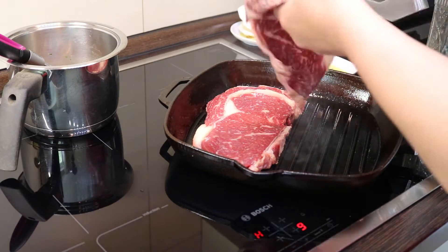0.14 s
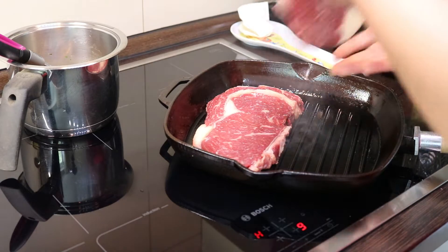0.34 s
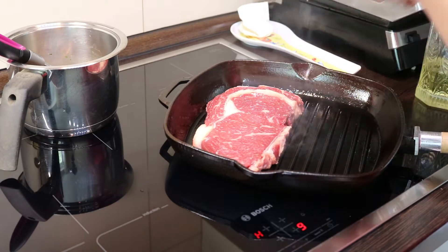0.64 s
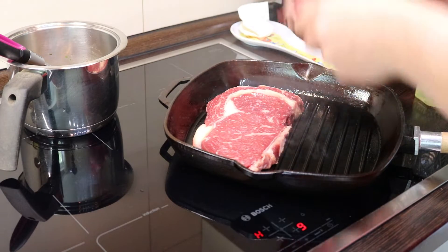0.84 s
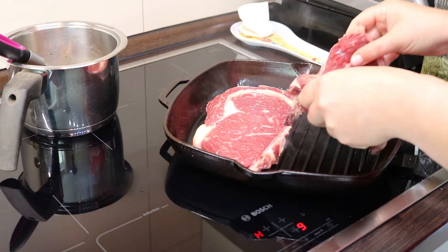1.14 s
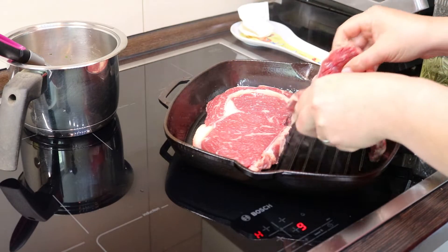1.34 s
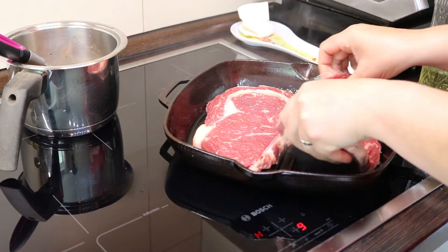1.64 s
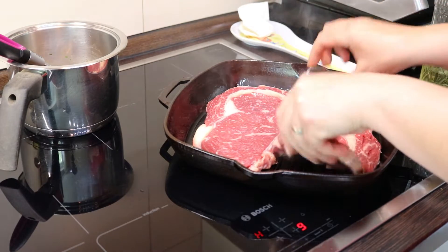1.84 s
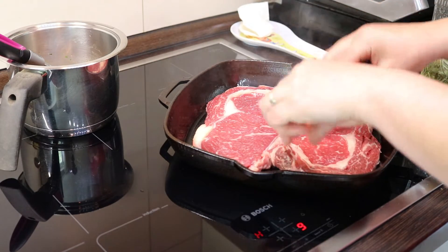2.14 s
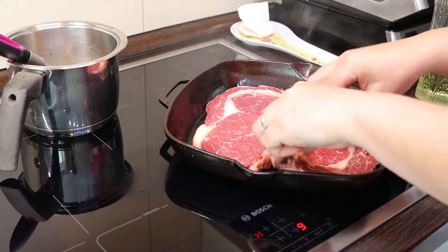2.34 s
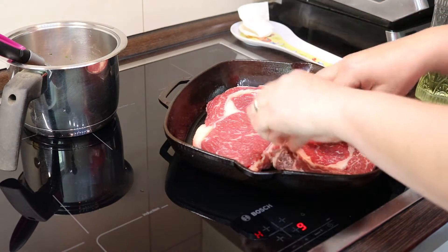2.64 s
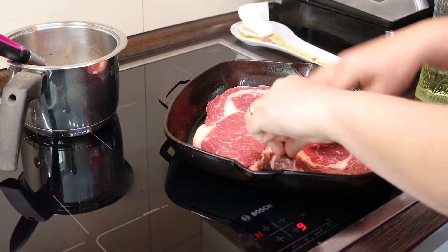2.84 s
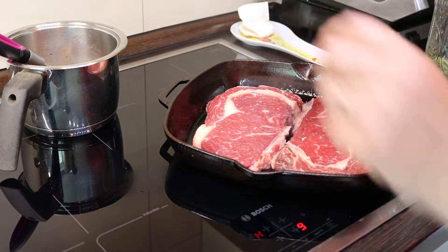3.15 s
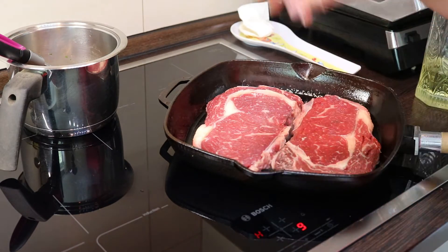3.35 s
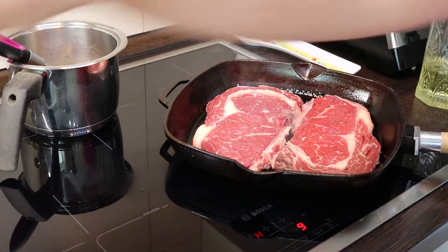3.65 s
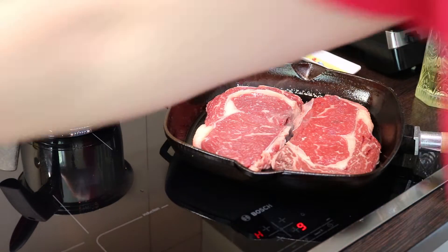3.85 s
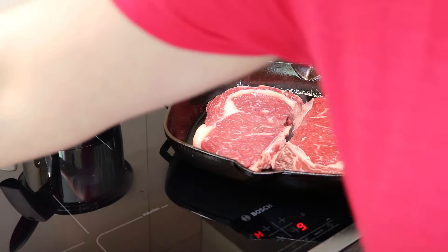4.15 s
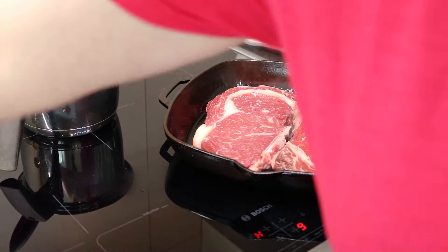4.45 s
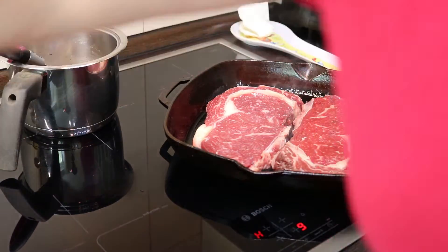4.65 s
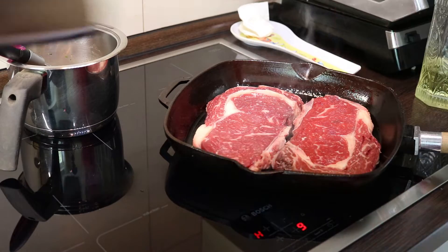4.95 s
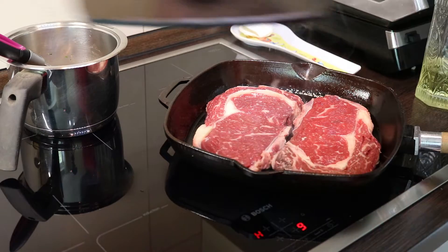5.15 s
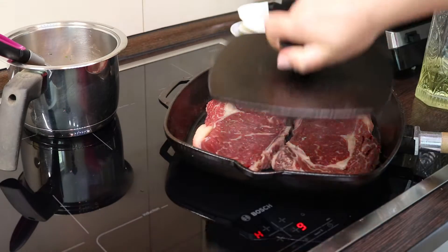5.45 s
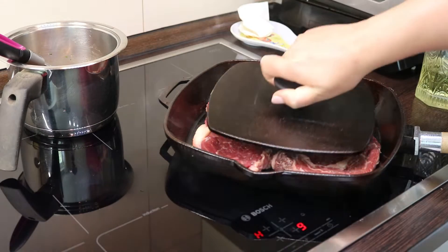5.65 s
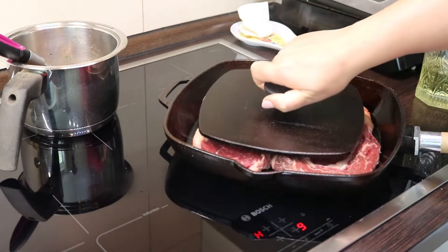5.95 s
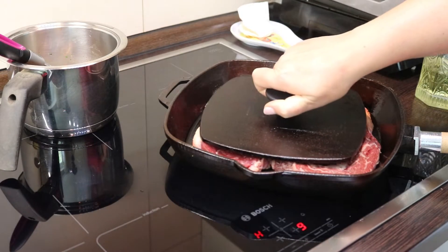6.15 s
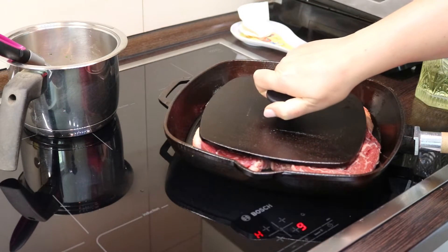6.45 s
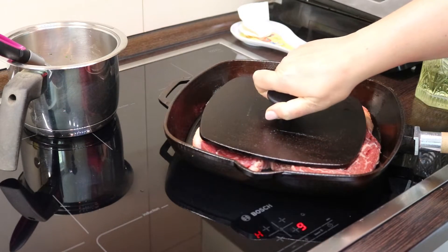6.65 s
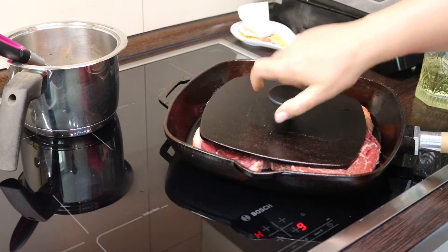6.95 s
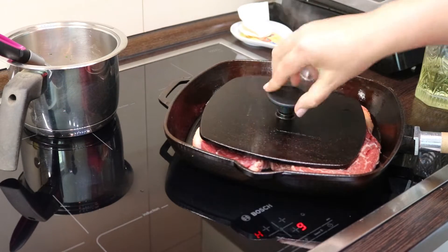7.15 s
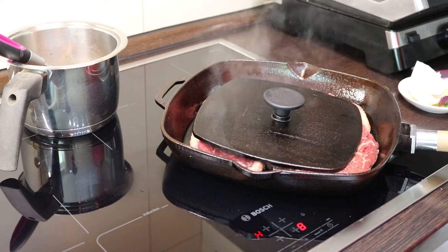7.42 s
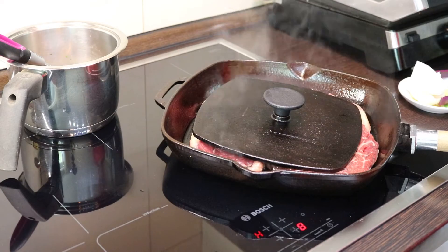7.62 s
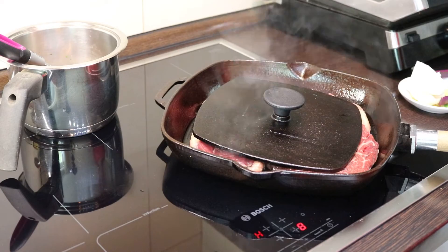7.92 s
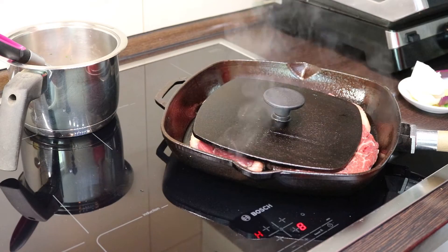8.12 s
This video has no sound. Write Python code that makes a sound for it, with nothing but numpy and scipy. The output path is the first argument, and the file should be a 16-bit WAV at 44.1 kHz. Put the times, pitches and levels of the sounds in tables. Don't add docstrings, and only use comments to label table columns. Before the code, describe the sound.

Two steaks sizzle in a heavy iron pan in a small, hard-surfaced kitchen, heard from very near. Crackling spits scatter left and right over steady fizz and a barely audible low hum. The strongest pops come early and near the middle; pressing the meat brings bubbling, knocking bursts. The frying suddenly stops, leaving brief faint air, silence, and a trace of hiss.

```python
import sys
import numpy as np
from scipy import signal
from scipy.fft import rfft, irfft, next_fast_len
from scipy.io import wavfile
from scipy.ndimage import uniform_filter1d, map_coordinates

SR = 44100
rng = np.random.default_rng(int(sys.argv[2]) if len(sys.argv) > 2 else 0)


def voltage_ratio(level):
    return 10 ** (np.asarray(level, float) / 20)


def transcribe(u):
    v = np.clip(np.atleast_2d(u).T, -1, 1)
    q = np.round(v * 32767).astype(np.int16)
    wavfile.write(sys.argv[1], SR, q)


N = 365148
CUT_S = 7.3353
PAN_CUT_HZ = 760


def unit(x):
    return x / np.sqrt(np.mean(x ** 2) + 1e-20)


def along(points, hz):
    f, v = np.transpose(points)
    return np.interp(np.log(hz + 1), np.log(f + 1), v)


def curves(rows):
    s, *cols = np.transpose(rows)
    return [np.interp(np.arange(N) / SR, s, c) for c in cols]


def wobble(rate_hz):
    coarse = np.arange(0, N + 32, 32)
    knots = rng.standard_normal(int(N * rate_hz / SR) + 4)
    return np.interp(np.arange(N), coarse, map_coordinates(knots, [coarse * rate_hz / SR]))


def filtered(x, response):
    m = next_fast_len(N + 8192)
    return irfft(rfft(x, m) * response(np.fft.rfftfreq(m, 1 / SR)), m)[..., :N]


def spread(pair, spectrum, alike, shape=lambda hz: 1):
    def response(hz):
        turn = np.arccos(np.clip(along(alike, hz), -1, 1)) / 2
        return voltage_ratio(along(spectrum, hz)) * shape(hz) * [np.cos(turn), np.sin(turn)]
    mid, side = filtered(pair, response)
    return np.array([mid + side, mid - side])


def patchy(patchy_db):
    z = signal.stft(rng.standard_normal((2, N)), nperseg=256)[2]
    field = uniform_filter1d(rng.standard_normal(z.shape[1:]), size=8, axis=0)
    field = uniform_filter1d(field, size=9, axis=1)
    return signal.istft(z * voltage_ratio(patchy_db * unit(field)), nperseg=256)[1][:, :N]


def bursts(rate_hz, size_db, life_s):
    draw = rng.random((2, N))
    size = (draw[0] < rate_hz / SR) * voltage_ratio(-size_db * np.log(draw[1] + 0.0098))
    return signal.lfilter([1], [1, -np.exp(-1 / (SR * life_s))], size)


def snap(pitch_hz, cycles):
    turns = pitch_hz * np.arange(200) / SR
    return -np.sin(2 * np.pi * turns) * np.exp(-(turns - .25) / cycles) * (1 - np.exp(-turns * 8))


# start_s, dip_db, recovery_s
DUCKS = [(.131, -3, 0.097), (.368, -3.5, 0.052), (.872, 0, 0.014), (3.57, -3.5, 0.024)]


def ducking():
    t = np.arange(N) / SR
    return sum(dip_db * (t > s) * np.exp(-(np.maximum(t - s, 0) / recovery_s) ** 2)
               for s, dip_db, recovery_s in DUCKS)


# pitch_hz, density_db (per Hz)
NEXT_HISS = [(88, -48), (150, -17), (328, 1.5), (1980, -19.5), (5930, -9.5), (8000, -25), (10400, -52),
             (17600, -120)]


def next_scene():
    start_s, rise_db_per_s, end_db = 8.2, 700, -60.5
    t = np.arange(N) / SR
    hiss = unit(filtered(rng.standard_normal(N), lambda hz: voltage_ratio(along(NEXT_HISS, hz))))
    return (t > start_s) * voltage_ratio(end_db - rise_db_per_s * (t[-1] - t)) * hiss


# pitch_hz, density_db (per Hz)
AIR = [(8.8, -33), (15, -1), (50, -5), (72, -10.5), (112, -22), (142, -25), (159, -37), (195, -23),
       (286, -35), (770, -31.5), (2650, -39.5), (3400, -46), (7280, -53), (14700, -50), (16000, -60)]
# start_s, end_s
SCRAPS = [
    (7.4825, 7.6725),
    (7.6825, 7.693),
]


def scrap():
    t = np.arange(N) / SR
    on = sum((t >= start_s) & (t < end_s) for start_s, end_s in SCRAPS)
    alike = [(300, .05), (900, 0.75), (2500, 0.77), (5000, .03)]
    air = unit(spread(rng.standard_normal((2, N)), AIR, alike))
    return voltage_ratio(-46.5 + .6 * wobble(30)) * on * air


# start_s, level_db
HUM = [(0, -55), (2.2, -57.5), (3.4, -64), (4.0, -61.5), (4.4, -57.5), (5.3, -60), (6.6, -59), (6.7, -67),
       (7.3, -62.5)]
# pitch_hz, density_db (per Hz)
RUMBLE = [(13, -60.5), (22, -28.5), (43, -18), (91, -14.5), (150, -13.5), (232, -13), (400, -10),
          (520, -29), (880, -120)]


def stove():
    turn = 2 * np.pi * 100 * np.arange(N) / SR + 0.6 * wobble(11)
    hum = np.sin(turn) + voltage_ratio(-17.0) * np.sin(2 * turn) + voltage_ratio(-11.5) * np.sin(3 * turn)
    rumble = unit(spread(patchy(patchy_db=1.0), RUMBLE, [(40, .1), (150, 0.32)]))
    hum_db = curves(HUM)[0] + 1.5 * ducking() + 1.6 * wobble(8.6) + 1.0 * wobble(25)
    draught_db = 1.5 * wobble(6)
    return voltage_ratio(hum_db) * np.sqrt(2) * hum + voltage_ratio(-60 + draught_db) * rumble


# pitch_hz, t60_s
KITCHEN = [(200, 0.33), (2000, 0.12), (10000, 0.085)]


def kitchen(x):
    hz, t, z = signal.stft(rng.standard_normal((2, SR // 3)), SR, nperseg=256)
    decay = voltage_ratio(-60 * t / along(KITCHEN, hz)[:, None])
    tail = signal.istft(z * decay, SR, nperseg=256)[1]
    delayed = np.pad(x, ((0, 0), (500, 0)))
    return signal.fftconvolve(delayed, tail / np.linalg.norm(tail[0]), axes=1)[:, :N]


# start_s, peak_db, pitch_hz, t60_s
THUMPS = [(0.952, -37.5, 120, .15), (1.01, -29, 378, 0.15), (1.031, -41, 260, 0.21),
          (1.342, -23.5, 896, 0.12), (1.86, -29, 700, 0.069), (2.663, -29.5, 750, 0.044),
          (3.189, -31, 750, 0.072), (4.535, -28.5, 800, 0.1), (4.755, -32, 700, 0.093),
          (5.87, -24.5, 1000, 0.05), (6.158, -20.5, 1300, 0.069), (6.456, -29, 800, 0.14),
          (3.355, -37, 270, 0.22), (3.41, -31.5, 200, 0.099), (3.44, -41.5, 150, .12),
          (3.85, -36.5, 350, 0.074), (3.87, -40, 190, .15), (4.889, -24, 980, 0.074),
          (5.47, -41, 172, 0.15), (5.6, -38, 238, .2), (6.05, -24, 1020, 0.13), (6.549, -21, 960, 0.09)]
# start_s, peak_db
BLASTS = [
    (0.105, -18),
    (.1285, -11),
    (0.8666, -25),
    (3.5624, -6),
]


def thumps():
    out, t = np.zeros(N + SR), np.arange(SR // 4) / SR
    for start_s, peak_db, pitch_hz, t60_s in THUMPS:
        band = signal.butter(1, [pitch_hz * .45, pitch_hz * 1.9], "bandpass", fs=SR)
        noise = rng.standard_normal(len(t))
        shake = unit(signal.lfilter(*band, signal.lfilter(*band, noise)))
        onset = 1 - np.exp(-t * pitch_hz / 2.9)
        out[round(start_s * SR):][:len(t)] += voltage_ratio(peak_db - 3.5 - 60 * t / t60_s) * onset * shake
    for start_s, peak_db in BLASTS:
        out[round(start_s * SR):][:len(t)] += voltage_ratio(peak_db) * np.exp(-t / 0.000077)
    return out[:N]


# pitch_hz, density_db (per Hz)
SIZZLE = [(150, -57), (250, -24), (466, -15), (535, -13), (682, -13), (1130, -6.5), (1430, -7.5), (2290, 2),
          (6920, 5), (14100, -2.5), (15600, -7.5)]


def spatter(level_db):
    drops = bursts(rate_hz=90, size_db=2, life_s=0.0002) * rng.standard_normal((2, N))
    return voltage_ratio(level_db - 11) * unit(spread(drops, SIZZLE, [(1000, 0.56), (10000, .3)]))


# start_s, peak_db, pitch_hz
TICKS = [(0.0487, -12.5, 5600.0), (0.2135, -1, 5190), (0.2494, -8.5, 6100.0), (0.6508, -18.5, 6400.0),
         (0.6958, -14.5, 9100.0), (0.9158, -15, 6900.0), (1.099, -7, 6090), (1.2168, -12.5, 6600.0),
         (1.2642, -24, 6000.0), (1.414, -14.5, 4100.0), (1.5278, -2, 8280), (1.9153, -10, 4100.0),
         (1.9412, -12, 3900.0), (2.0448, -10.5, 7900.0), (2.188, -7.0, 10730), (2.196, -8.5, 10000.0),
         (2.2107, -15.5, 7100.0), (2.2496, -14.5, 6110), (2.368, -10, 4300.0), (2.5032, -6.5, 8420),
         (2.5878, -11.0, 12630), (2.6409, -6, 10400.0), (2.9817, -13, 8670), (3.026, -11.0, 7380),
         (3.1888, -5.5, 7700.0), (3.3659, -9, 7000.0), (3.64, -8, 5500.0), (3.858, -13.5, 6000.0),
         (3.8787, -14.5, 6700.0), (4.0326, -3.5, 6280), (4.1689, -13, 5900.0), (4.2819, -8, 9140),
         (4.3837, -14.0, 7220), (4.4746, -11, 7290), (4.5644, -10.0, 6710), (4.6311, -13.5, 4700.0),
         (4.6502, -13.5, 4800.0), (4.673, -6.5, 6900.0), (4.8727, -15.5, 3200.0), (4.9132, -7.5, 8300.0),
         (5.0091, -9.5, 8400.0), (5.0617, -19.5, 4310), (5.3507, -14.0, 7520), (5.416, -16, 7480),
         (5.436, -10, 8930), (5.455, -5, 9600.0), (5.4693, -13.0, 7600.0), (5.5118, -7.5, 5900.0),
         (5.52, -5.5, 7900.0), (5.5237, -2, 6430), (5.6512, -10, 8000.0), (5.788, -10.5, 9570),
         (5.834, -12.5, 7380), (5.9639, -11, 7960), (5.9716, -12.5, 9200.0), (5.991, -14, 4500.0),
         (6.7564, -11, 6900.0), (7.2542, -10, 5400.0), (7.2747, -13.5, 3400.0), (7.292, -19.5, 4800.0)]


def ticks():
    out = np.zeros((2, N))
    for start_s, peak_db, pitch_hz in TICKS:
        crack = snap(pitch_hz, cycles=.9)
        port_db = peak_db + rng.normal(0, 1.3, (2, 1))
        out[:, round(start_s * SR):][:, :len(crack)] += voltage_ratio(port_db) * crack
    return signal.lfilter(*signal.butter(2, PAN_CUT_HZ, "highpass", fs=SR), out)


# delay_ms, level_db
ECHOES = [(.7, -3.5), (1.7, -6.5), (2.9, -4), (4.6, -1), (6.2, -8.5), (8.9, -7), (12, -20)]


def reply():
    n = np.arange(SR // 40)
    delay_ms, level_db = np.transpose(ECHOES)[:, :, None]
    late = n - delay_ms * SR / 1000
    shape = np.sum(voltage_ratio(level_db - 16.5) * (late >= 0) * np.exp(-np.abs(late) / 50), axis=0)
    return (n == 0) + shape * rng.standard_normal((2, len(n)))


# start_s, peak_db, pitch_hz, body_db, treble_db
POPS = [(0.1075, -2, 7040, -23.5, -24.5), (0.1276, 5, 5720, -28.5, -15.5),
        (0.3446, -17.5, 5310, -12.5, -4.5), (0.3559, 3, 6450, -43, -19), (0.4945, 2.5, 11800, -25.5, -8),
        (0.5733, -5, 5420, -20.5, -12), (0.612, -2.5, 5440, -30, -9.5), (0.6823, -12, 5570, -14.5, -16),
        (0.8552, -9, 6250, -22, -11), (0.8661, 0.5, 7090, -37.5, -27), (1.0568, -7.5, 4700, -18, -10.5),
        (1.1568, -2, 6940, -22.5, -6), (1.285, -3, 8290, -11.5, -22.5), (1.3407, -4, 8770, -13.5, -20.5),
        (1.6546, -5.5, 6840, -18, -15), (1.6934, -10, 8680, -13.5, -9), (1.7105, -7.5, 7460, -21.5, -24),
        (1.733, -8, 5500, -17, -15), (1.7824, -14, 5310, -20.5, -20), (1.9008, -7, 6400, -13, -17),
        (2.1077, -9.5, 4900, -17.5, -18.5), (2.327, -5, 6450, -20, -16.5), (2.3884, -11.5, 6290, -14, -17),
        (2.4086, -9, 6980, -23, -21), (2.4379, -7, 5440, -16, -18.5), (2.5384, -15.5, 7140, -57, -19.5),
        (2.6447, -7, 5720, -29, -22.5), (2.6633, -4.5, 5440, -17.5, -16.5), (2.7868, -11, 7200, -11, -18.5),
        (2.8177, -5.5, 5410, -22.5, -22), (2.8804, -9.5, 9900, -18, -16), (2.8885, -1.5, 7170, -18, -15.5),
        (2.9318, 0.5, 9640, -22.5, -17), (3.153, -12, 4880, -25, -17.5), (3.1943, -9.5, 3130, -27.5, -15),
        (3.3792, -6.5, 6060, -16.5, -17.5), (3.4558, -3.5, 6970, -21.5, -24),
        (3.4847, -7.5, 7080, -13, -16), (3.5609, 5, 6700, -9, -29.5),
        (3.6217, -4, 6850, -14.5, -22.5), (3.6588, -9, 6170, -19.5, -24.5),
             (3.7428, -9.5, 6040, -23, -18.5), (3.7917, -10, 5790, -17.5, -21),
             (3.9338, -4, 5450, -17, -16), (4.458, -11.5, 3250, -21, -17), (4.4984, -13.5, 4330, -11, -19),
             (4.5347, -3.5, 5720, -9.5, -21), (4.7604, -7, 6910, -15, -11), (4.8034, -8.5, 6950, -9.5, -18),
             (4.825, -8, 6250, -16.5, -18), (4.8841, -5, 3570, -16, -10), (4.9814, -4, 5840, -18, -25.5),
             (4.9948, -7, 5120, -13, -22.5), (5.1194, 0, 7500, -12, -14.5), (5.1443, -12.5, 3770, -13, -24),
             (5.1888, -5, 6300, -1, -21), (5.226, -6.5, 3300, -17.5, -19),
             (5.2876, -6.5, 4920, -15.5, -14.5), (5.3073, -4, 6870, -27.5, -18.5),
             (5.3134, -4, 5000, -14, -13), (5.4842, -9, 3330, -14, -13.5),
             (5.837, -4.5, 6600, -14.5, -24.5), (5.8688, -7, 2490, -10.5, -17.5),
             (6.05, -7.5, 3350, -12, -16), (6.109, -6.5, 6930, -15, -14.5), (6.158, -19.5, 2160, -15, -13),
             (6.37, -7.5, 3080, -16.5, -17.5), (6.4135, -11, 2710, -16, -20.5),
             (6.4577, -6.5, 7220, -12, -16), (6.5473, -4.5, 2330, -12, -21), (6.6024, -2.5, 5960, -23, -27),
             (6.6526, -2.5, 5070, -22, -27), (6.9192, -10.5, 6810, -21.5, -12),
             (7.0096, -10.5, 2680, -14.5, -20), (7.085, -12.5, 4820, -15, -15.5),
             (7.1439, -5, 4620, -15.5, -29.5), (7.2304, -17.5, 7230, -19, -11),
             (7.314, -11, 4580, -14, -20.5), (7.3296, -5.5, 5430, -24.5, -27.5)]
# start_s, peak_db, pitch_hz
KNOCKS = [(0.107, -17.5, 1221), (0.127, -20.5, 2330), (0.494, -23.5, 1710), (1.054, -23, 1900),
          (1.341, -17.5, 1180), (1.858, -16.5, 2290), (2.052, -14, 1400), (2.252, -20, 2050),
          (2.369, -23, 1880), (2.459, -17.5, 2240), (2.848, -20, 2380), (2.993, -25, 2080),
          (3.56, -11.5, 1770), (4.745, -11.5, 2240), (4.787, -19, 2390), (4.89, -11, 2300),
          (5.966, -23.5, 2420), (6.05, -22.5, 1530), (6.108, -16, 1520), (6.158, -8.5, 2180),
          (6.34, -18.5, 2270), (6.46, -9, 1880), (6.55, -20, 2360), (6.642, -27.5, 2410),
          (6.655, -9.5, 2310), (6.788, -31, 2200), (7.088, -22, 2190)]


def pops():
    out = np.zeros((2, N + SR))
    cracks = []
    for start_s, peak_db, pitch_hz, body_db, treble_db in POPS:
        crack = snap(pitch_hz, cycles=1.5)
        crack = crack + voltage_ratio(body_db + 2.5) * snap(.6 * pitch_hz, cycles=1.5)
        crack = crack + voltage_ratio(treble_db + 10) * snap(10700, cycles=2.0)
        cracks.append((start_s, 1.15 * peak_db - .5, crack))
    for start_s, peak_db, pitch_hz in KNOCKS:
        cracks.append((start_s, peak_db - 4, snap(pitch_hz, cycles=1.2)))
    lag_s = .0011
    for start_s, level_db, crack in cracks:
        answer = reply()
        answer[:, 0] = 1
        direct = voltage_ratio(level_db) * crack / np.abs(crack).max()
        pop = signal.fftconvolve(direct[None], answer, axes=1)
        out[:, round((start_s + lag_s) * SR):][:, :pop.shape[1]] += pop
    return signal.lfilter(*signal.butter(2, PAN_CUT_HZ, "highpass", fs=SR), out[:, :N])


# start_s, strength_db, wetness_db
BOIL = [(0.0, -23, -18.5), (0.28, -24, -18), (1.61, -26.5, -17), (1.77, -25, -17), (1.95, -22, -15),
        (2.29, -24, -17.5), (3.09, -26.5, -15.5), (3.6, -21.5, -20.5), (3.9, -27.5, -16.5),
        (4.92, -22.5, -15), (4.98, -23.5, -17), (5.69, -27.5, -15.5), (5.91, -24.5, -13.5),
        (6.57, -24.5, -10), (6.89, -25, -12), (7.15, -26.5, -14.5)]
# low_hz, high_hz
SIZES = [
    (400, 1800),
    (1800, 4300),
    (4300, 9000),
    (9000, 19000),
]
# share_db, follows (dB per dB of wetness)
SHARES = [
    (3, 0.95),
    (-3, 0.41),
    (-6.5, -0.034),
    (-4, 0.017),
]
# start_s (centre), rise_db,
# pitch_hz,
FLASHES = [(0.202, 5.5, 6500, 0.038), (0.387, -12, 1780, 0.044), (1.125, 5.5, 7040, 0.08),
           (1.08, 6.5, 900, 0.031), (1.323, 6, 2500, 0.046), (1.578, 9.5, 1940, 0.03),
           (1.744, 2, 10000, 0.06), (1.92, 5, 3500, 0.2), (2.1, 1.5, 1000, 0.031), (2.19, 5, 12000, 0.013),
           (2.404, 3.5, 2800, 0.13), (2.546, 3, 12000, 0.071), (2.637, 4.5, 5500, 0.042),
           (2.95, 8.5, 11100, 0.08), (3.314, 1.5, 2800, 0.12), (3.435, -1, 8000, 0.075),
           (3.62, -9, 14000, 0.081), (3.743, 2.5, 6550, 0.017), (4.306, -1, 2993, 0.059),
           (4.524, 5, 1800, 0.064), (4.76, 6.5, 5000, 0.025), (4.847, 6, 3000, 0.035),
           (5.09, -2.5, 8000, 0.037), (5.508, 4.5, 7040, 0.03), (5.881, 12.5, 1500, 0.0086),
           (6.078, 9, 3000, 0.029), (6.16, 4, 1197, 0.0069), (6.52, 5.5, 6510, 0.14),
           (6.588, 3, 1467, 0.038), (7.06, 6.5, 4940, 0.066)]


def boil():
    (strength_db, wet_db), levels_db = curves(BOIL), []
    wet_db = wet_db + 1.8 * ducking()
    t = np.arange(0, N, 64) / SR
    s, rise_db, pitch_hz, half_s = np.transpose(FLASHES)[:, :, None]
    for (low_hz, high_hz), (share_db, follows) in zip(SIZES, SHARES):
        octaves = np.log2(pitch_hz / np.sqrt(low_hz * high_hz))
        near = np.exp(-(octaves / 0.96) ** 2)
        flash_db = np.sum(rise_db * near * np.exp(-((t - s) / half_s) ** 2), axis=0)
        flash_db = np.interp(np.arange(N) / SR, t, flash_db)
        seethe_db = 1 * wobble(7)
        levels_db.append(strength_db + share_db + follows * wet_db + flash_db + seethe_db)
    return levels_db


# pitch_hz, likeness (-1 to 1)
ALIKE = [(100, 0.59), (400, 1), (1000, 0.46), (2500, 0.27), (6000, 0.06), (14000, -0.09)]
# pitch_hz, width_hz, level_db
PAN_MODES = [(534, 13, 10.5), (608, 16, 1.5), (648, 22, 1), (760, 35, 4.5), (923, 70, -6.5), (1096, 30, 3),
             (1330, 45, -0.5), (1524, 25, 4.5), (1726, 41, -3)]


def sizzle(levels_db):
    surge_db = 0.64 * wobble(15) + 0.25 * wobble(45)
    total, fizz = 0, patchy(patchy_db=1.0)

    def ring(hz):
        modes = [voltage_ratio(db) / (1 + (2 * (hz - pitch_hz) / width_hz) ** 2) for pitch_hz, width_hz, db in PAN_MODES]
        return 1 + .5 * sum(modes)

    for (low_hz, high_hz), level_db in zip(SIZES, levels_db):
        def shape(hz):
            edge = 1 / np.sqrt((1 + (low_hz / (hz + 1)) ** 6) * (1 + (hz / high_hz) ** 6))
            return edge * ring(hz)
        snaps = bursts(rate_hz=220, size_db=4.5, life_s=0.0007) * rng.standard_normal((2, N))
        crackle = signal.oaconvolve(snaps, reply(), axes=1)[:, :N]
        band = spread(fizz + voltage_ratio(-3.0) * unit(crackle), SIZZLE, ALIKE, shape)
        total = total + voltage_ratio(level_db + surge_db + 0.45 * wobble(16)) * unit(band)
    return total


# start_s, left_minus_right_db
LEAN = [(0.0, -1.5), (0.26, -1), (3.98, -1.5), (4.33, 0), (4.82, 0), (5.25, -2), (5.94, -1), (7.04, -2),
        (7.33, -1)]


def scene():
    near, levels_db = pops() + thumps(), boil()
    lean_db = curves(LEAN)[0] / 2
    pan = sizzle(levels_db) + spatter(levels_db[2]) + ticks() + near
    pan = pan * voltage_ratio(np.array([lean_db, -lean_db])) + voltage_ratio(-9.5) * kitchen(near)
    n = np.arange(N)
    gate = np.exp(-np.maximum(n / SR - CUT_S, 0) / 0.00073) * np.where(n < CUT_S * SR, 1, .3)
    return (pan + stove()) * gate + scrap() + next_scene()


def band_limit(x):
    return signal.sosfilt(signal.butter(12, 16400, fs=SR, output="sos"), x)


def record(dry):
    x = dry * voltage_ratio(ducking())
    x = x / (1 + np.abs(x) ** 8) ** (1 / 8)
    top_hz, flicker_hz = 15950, 15200
    x = filtered(x, lambda hz: voltage_ratio(-60 / (1 + np.exp(np.clip((top_hz - hz) / 90, -50, 50)))))
    lost = (wobble(20) > .3) * (np.arange(N) < CUT_S * SR)
    x = x - uniform_filter1d(lost * 1., size=200) * filtered(x, lambda hz: hz > flicker_hz)
    return band_limit(x)


dry = scene()
out = record(dry)
transcribe(out)
```